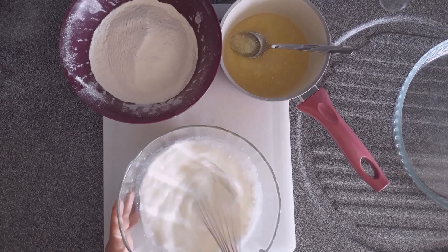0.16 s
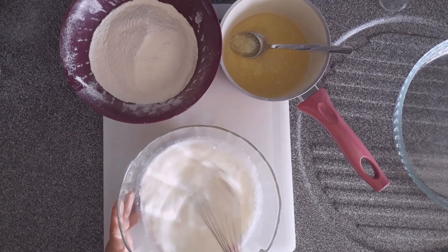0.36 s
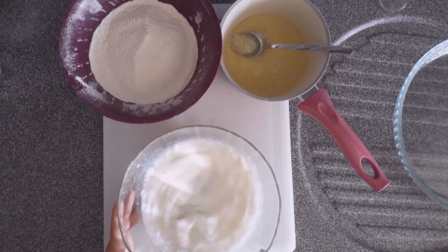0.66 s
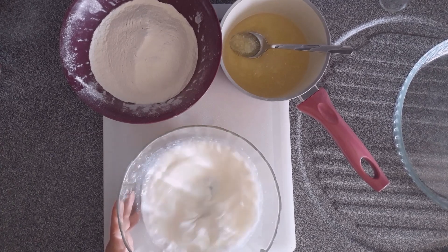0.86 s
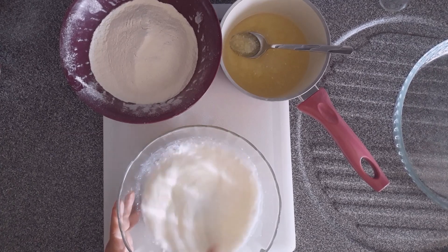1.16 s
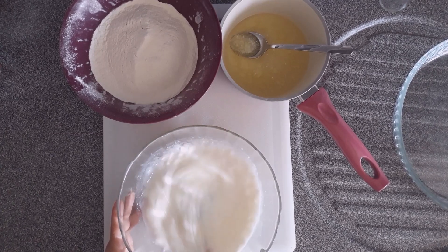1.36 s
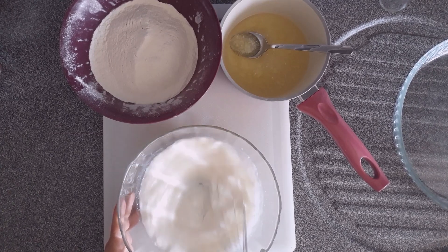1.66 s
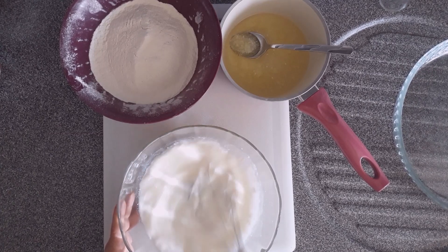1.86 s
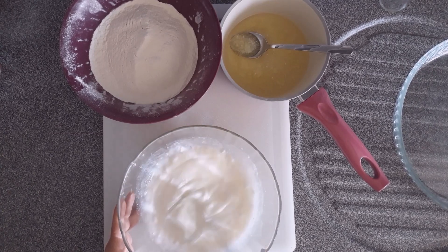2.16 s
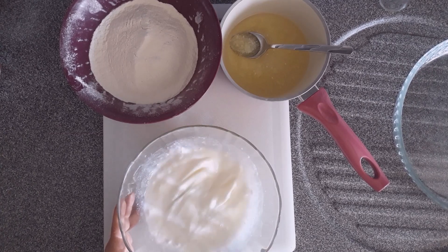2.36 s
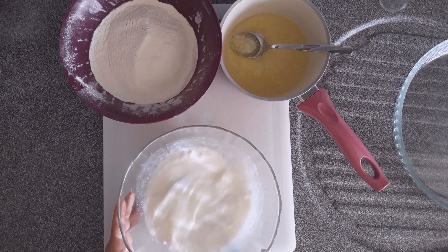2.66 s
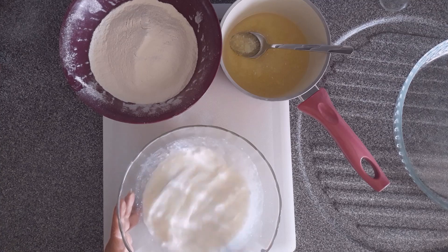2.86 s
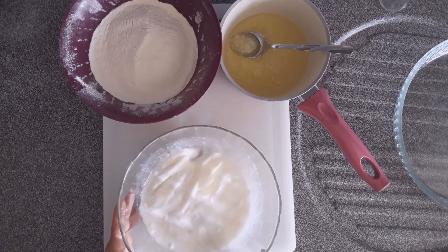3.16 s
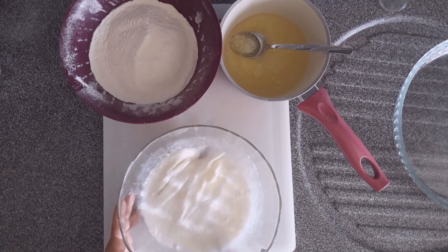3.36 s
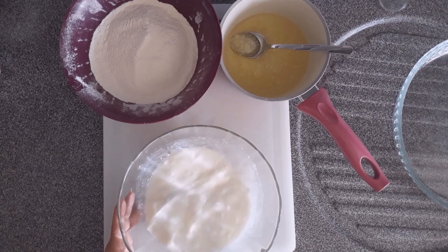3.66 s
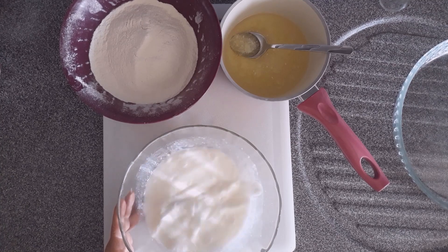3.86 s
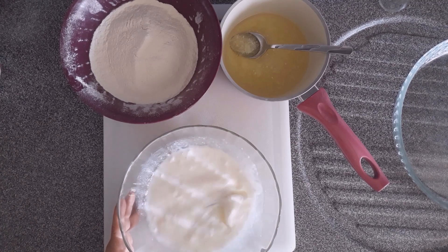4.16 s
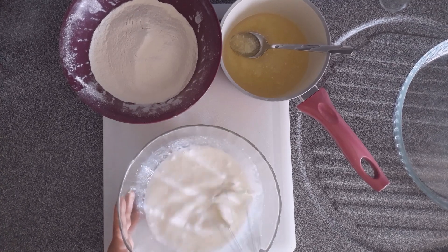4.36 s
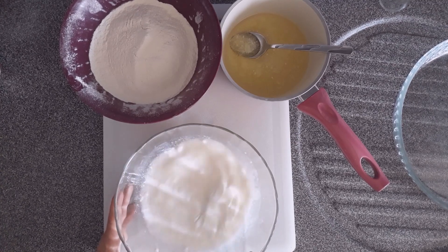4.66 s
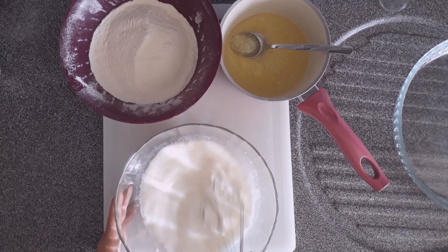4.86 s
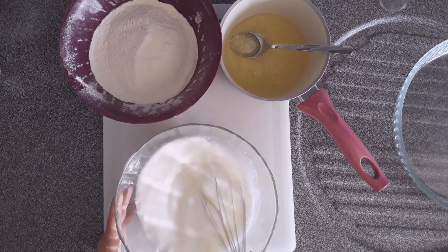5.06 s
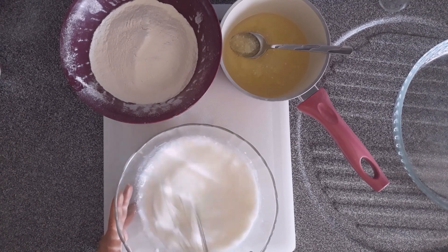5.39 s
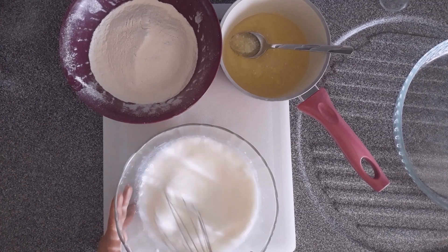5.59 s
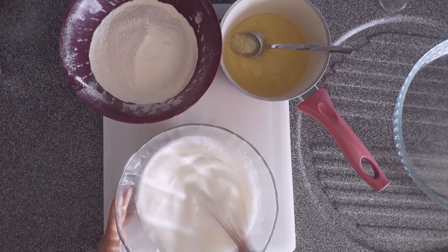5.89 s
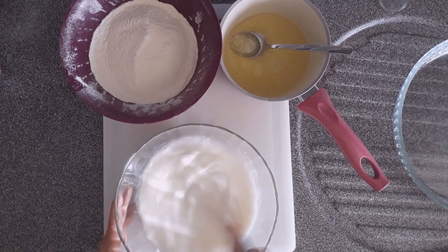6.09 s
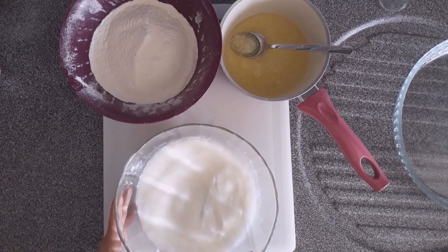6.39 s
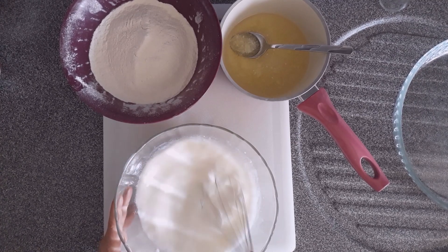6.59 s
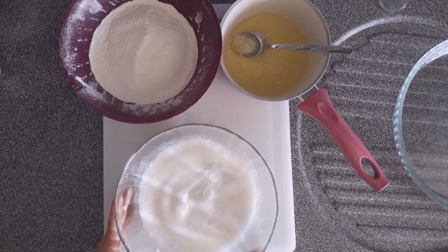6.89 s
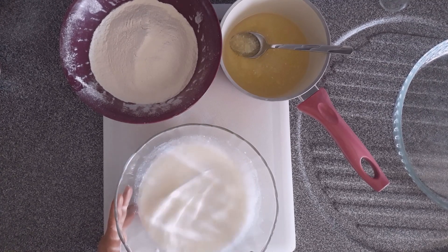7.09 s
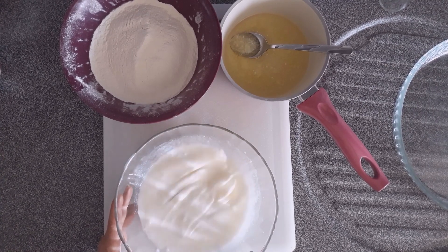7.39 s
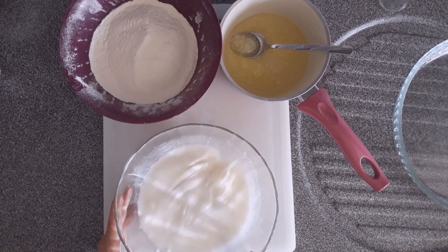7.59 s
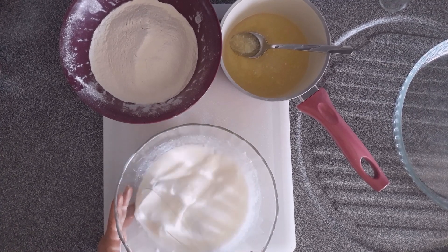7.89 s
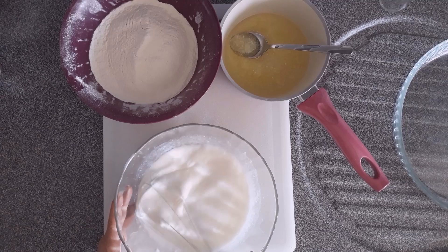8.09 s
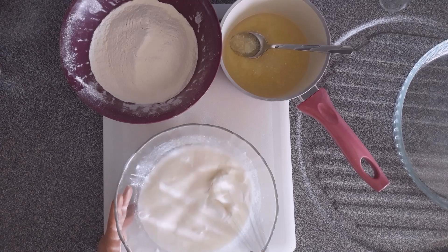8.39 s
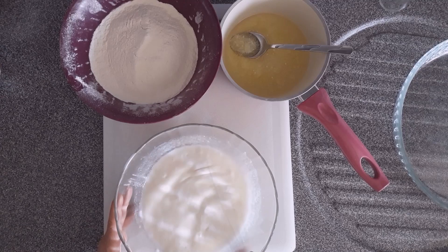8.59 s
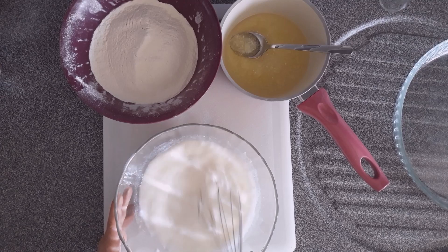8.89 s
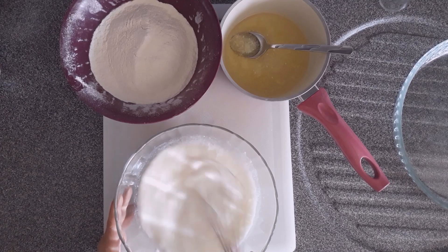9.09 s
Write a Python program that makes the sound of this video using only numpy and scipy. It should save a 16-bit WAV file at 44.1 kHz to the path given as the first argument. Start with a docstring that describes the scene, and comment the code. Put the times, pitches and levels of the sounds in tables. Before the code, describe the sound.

A thin metal whisk works runny batter in a glass bowl, heard close with slight hard-surfaced kitchen reflections and a low quiet hum. Gentle circling gives way to fast, even clattering strokes, each a sharp tinny tick plus a muffled bowl thud. Then comes a deeper, gurgling swirl with fewer ticks, another run of sharp strokes, and a last brief swirl. The glass rim occasionally rings faintly.

```python
"""A wire whisk stirs and beats thin batter in a glass bowl on a kitchen counter, held by one hand.
Trains of tiny clicks make the wires chatter on the glass; torn, spurting noise makes the wet swish.
Rising sine pings make the bubbles, ticks and taps; damped modes make the dull knock and the ringing rim.
A short, hard room tail and a quiet bed of coloured noise put it all in the kitchen."""
import sys
import numpy as np
from scipy import signal
from scipy.fft import rfft, irfft
from scipy.io import wavfile

SR = 44100
rng = np.random.default_rng(int(sys.argv[2]) if len(sys.argv) > 2 else 0)


def master(y):
    """Save y as 16-bit WAV."""
    cut = np.clip(np.atleast_2d(y).T, -1, 1)
    pcm = np.round(cut * 32767)  # scale
    wavfile.write(sys.argv[1], SR, pcm.astype(np.int16))


N = 407925


def amp(db):
    """Decibels to gain."""
    return 10 ** (np.asarray(db) / 20)


def unit(x):
    """Scale to an energy of one."""
    return x / np.sqrt(np.sum(x ** 2))


def clock(length):
    """Sample times over a length in seconds."""
    return np.arange(int(length * SR)) / SR


def curve(rows):
    """Join (time [s], value) rows by straight lines."""
    return np.interp(np.arange(N) / SR, *np.transpose(rows))


def add(track, s, sound):
    """Mix a sound into a track at a time in seconds."""
    start = max(int(s * SR), 0)
    part = sound[:max(N - start, 0)]
    track[start:start + len(part)] += part


def through(x, response):
    """Pass a sound through an impulse response."""
    return signal.fftconvolve(x, response)[:len(x)]


def colour(points, peaks=(), size=4096):
    """Causal unit-energy filter from (Hz, dB) points and (Hz, boost dB, width Hz) resonances."""
    hz, db = np.transpose(points)
    bins = np.fft.rfftfreq(size, 1 / SR)
    shape = np.interp(np.log(bins + 1), np.log(hz), db)
    for centre, boost, width in peaks:
        shape = shape + boost / (1 + (2 * (bins - centre) / width) ** 2)
    # folding the cepstrum forward makes the filter minimum-phase
    cepstrum = irfft(np.log(amp(shape)))
    cepstrum[1:size // 2] *= 2
    cepstrum[size // 2 + 1:] = 0
    response = unit(irfft(np.exp(rfft(cepstrum))))
    return np.pad(response, (0, len(clock(.5)) - size))


def ring(modes, start=0):
    """Damped modes sounding together; given its start time, a ring swings in step with earlier ones."""
    t = clock(0.54)
    return sum(amp(db - 60 * t / t60) * np.sin(2 * np.pi * hz * (t + start)) for hz, t60, db in modes)


def shifting(force, modes, detune, count=5):
    """Ring modes whose pitch keeps jumping as the batter heaves and reshapes the hollow."""
    reshape_s = 0.035  # how long the batter keeps one shape
    shape = rng.integers(count, size=N)[(np.arange(N) / SR / reshape_s).astype(int)]
    out = np.zeros(N)
    for k, step in enumerate(np.linspace(-1, 1, count)):
        detuned = [(hz * (1 + detune * step), t60, db) for hz, t60, db in modes]
        out += through(force * (shape == k), unit(ring(detuned)))
    return out


def clicks(size, rate, spread_db):
    """Random clicks of unequal strength, rate per second, rms one."""
    present = rng.random(size) < rate / SR
    strength = amp(spread_db * np.clip(rng.standard_normal(size), -2, 2))
    train = present * strength * rng.choice([-1, 1], size)
    return unit(train + 1e-9) * np.sqrt(size)


def swell(attack, hold, release):
    """Envelope that rises over the attack, is down to half at the hold time and dies with the release."""
    t = clock(hold + 10 * release)
    return np.minimum(t / attack, 1) / (1 + np.exp((t - hold) / release))


# colour of the quiet kitchen: (frequency [Hz], relative level [dB])
KITCHEN_COLOUR = [(25, -14.5), (55, -12), (72, 4), (90, 4.5), (800, -5), (2000, -13), (16000, -25.5)]


def kitchen(level_db=-49):
    """The quiet kitchen: a steady bed of noise, mostly a low hum-like rumble."""
    return amp(level_db) * through(rng.standard_normal(N), colour(KITCHEN_COLOUR))


def room(x, wet_db=-9, t60=0.36, treble_t60=0.24, gap_s=0.00374):
    """Counter, sink and tiles return a short diffuse tail, a little longer in the lows."""
    t = clock(.5)
    low_pass = signal.butter(2, 2500, fs=SR, output="sos")
    high_pass = signal.butter(2, 2500, "high", fs=SR, output="sos")
    low = signal.sosfilt(low_pass, rng.standard_normal(len(t)))
    high = signal.sosfilt(high_pass, rng.standard_normal(len(t)))
    tail = low * np.exp(-np.log(1000) * t / t60) + high * np.exp(-np.log(1000) * t / treble_t60)
    return x + amp(wet_db) * through(x, unit(tail * (t > gap_s)))


def radiate(x):
    """A bowl is too small to radiate deep bass."""
    return signal.sosfilt(signal.butter(2, 115, "high", fs=SR, output="sos"), x)


def bubble(hz, t60, rise=0.19):
    """A pocket of air rings and climbs in pitch as it nears the surface."""
    t = clock(t60)
    climbing = t + rise * t ** 2 / (2 * t60)
    return np.exp(-np.log(1000) * t / t60) * np.sin(2 * np.pi * hz * climbing)


# bubbles, and light wire taps and ticks in the shortest, highest rows:
# (time [s], relative level [dB], starting pitch [Hz], t60 [s])
POPS = [(0.475, -23, 948, 0.061), (.5871, -27, 3820, 0.011), (0.792, -25.5, 3960, 0.0075),
        (.847, -18.5, 914, 0.03), (1.62, -15.5, 3380, 0.014), (2.284, -22, 1260, 0.041),
        (2.394, 5, 7200, 0.0014), (2.394, -20.5, 910, 0.021), (2.56, -20.5, 482, 0.074),
        (2.965, -20.5, 465, 0.069), (3.002, -21.5, 760, 0.061), (3.236, -21.5, 780, 0.069),
        (4.2, -17, 5300, 0.025), (4.219, -20, 443, 0.087), (5.9932, -9.5, 993.4, 0.026),
        (6.2154, -22.5, 3750, .012), (8.521, -26.5, 1110, 0.033)]


def pops():
    """Single bubbles ring; the shortest, highest pings are light wire taps and ticks."""
    out = np.zeros(N)
    for s, db, hz, t60 in POPS:
        add(out, s, amp(db) * bubble(hz, t60))
    return out


# wires catching the bare glass:
# (time [s], relative level [dB], pitch favoured by the contact [Hz], offset of the other modes [dB])
CHIMES = [(4.157, -12.5, 3493, -14.5), (4.19, -48, 1652, -20), (4.212, -25, 2510, 0.5),
          (4.24, -33, 950, -27), (7.968, -26.5, 1652, -15), (8.17, -30, 1652, -14)]
# glass bowl, ringing freely: (frequency [Hz], t60 [s], relative level [dB])
GLASS_MODES = [(950, .28, -4), (1652, .52, -6), (2510, .4, -3), (3493, .22, -1), (4533, .19, 0),
               (4603, .19, -4), (6750, .16, -3), (8590, .15, -3)]


def chimes():
    """The rim rings: each rub feeds the mode nearest its own pitch and shifts the level of the others."""
    rub_cycles = 23  # swings that a rubbed mode needs to build up
    out = np.zeros(N)
    for s, db, favoured_hz, others_db in CHIMES:
        nearest = min(GLASS_MODES, key=lambda mode: abs(mode[0] - favoured_hz))[0]
        modes = [(hz, t60, mode_db + others_db * (hz != nearest)) for hz, t60, mode_db in GLASS_MODES]
        sound = ring(modes, s)
        build_up = np.minimum(np.arange(len(sound)) / SR * nearest / rub_cycles, 1)
        add(out, s, amp(db) * build_up * sound)
    return out


def froth(drive, low_hz, high_hz, cycles, count, spread_db=14):
    """Many bubbles of random size, each following the drive at its birth."""
    out, energy = np.zeros(N), 0
    for when, size, strength in rng.random((count, 3)):
        hz = low_hz * (high_hz / low_hz) ** size
        sound = amp(-spread_db * strength) * np.sqrt(hz) * bubble(hz, cycles / hz)
        add(out, when * N / SR, drive[int(when * N)] * sound)
        energy += np.sum(sound ** 2)
    return out * np.sqrt(N / energy)


def bubbles(speed, depth, largest_db=-35):
    """Deep gulps, lighter gurgles and a high fizz follow the moving wires."""
    # a pocket holds only so much air, however fast the wires move
    air = amp(largest_db) * np.tanh(speed / amp(largest_db))
    gulps = amp(-10) * froth(air * depth, 301, 604, cycles=28, count=700)
    gurgles = amp(-7.0) * froth(air, 614, 1235, cycles=43, count=600)
    fizz = amp(-8.5) * froth(air, 2690, 6800, cycles=34, count=500)
    return gulps + gurgles + fizz


# low modes of the room (142, 189, 315 Hz), then bowl, batter and board moving together: (centre frequency [Hz],
# t60 [s], relative level [dB])
BODY_MODES = [(142, 0.67, -12.5), (189.2, 0.38, -10.5), (314.8, 0.36, -8.5), (465, 0.096, 5),
              (531, 0.099, 8.5)]


def body_knock(push, slosh, depth):
    """Bowl, batter and board knock dully together and wake low room modes, heavier as the whisk reaches deeper."""
    return shifting((amp(-4.0) * push + amp(-9.0) * slosh) * depth, BODY_MODES, detune=0.053)


# hollow of the bowl above the batter, plus a damped ring of the glass at 954 Hz: (centre frequency [Hz], t60
# [s], relative level [dB])
HOLLOW_MODES = [(755.5, 0.057, 4.5), (954, 0.15, -6), (1387, 0.025, 0.5)]


def hollow_ring(push, slosh):
    """Pushes and slosh excite the hollow of the bowl above the batter and a damped ring of the glass."""
    return shifting(amp(-3.0) * push + amp(-9.0) * slosh, HOLLOW_MODES, detune=0.0418)


# bands in which wet wires sing near the surface: (centre frequency [Hz], t60 [s], relative level [dB])
SKIM_MODES = [(3302, 0.013, 4), (5620, 0.011, 0.5)]


def surface_skim(skimming, coated, depth):
    """Wet wires sing briefly near the surface, weaker as the whisk reaches deeper."""
    force = (amp(-8.0) * skimming + amp(-10.5) * coated) / np.sqrt(depth)
    return shifting(force, SKIM_MODES, detune=0.085)


# broad resonances of the batter-filled bowl: (frequency [Hz], boost [dB])
BOWL_PEAKS = [(3380, 5.5), (5520, 7), (6780, 8), (8120, 0.5), (9550, -1.5), (10380, 2), (12650, 3.5)]


def bowl_peaks(width_hz=540):
    """The batter-filled bowl colours every scrape and swish with broad resonances."""
    return [(hz, db, width_hz) for hz, db in BOWL_PEAKS]


# colour of the wet swish: (frequency [Hz], relative level [dB])
SWISH_COLOUR = [(150, -10), (1300, 9), (2100, -0.5), (3200, 4), (4400, -1.5), (5400, 4.5), (6200, 2),
                (8300, 12), (11500, 1.5), (16000, -9.5)]


def wet_swish(speed, depth):
    """Films of batter tear between the moving wires in tiny clicks."""
    tearing = speed * clicks(N, rate=7000, spread_db=4.5)
    return through(tearing * depth ** 0.37, amp(-2.0) * colour(SWISH_COLOUR, bowl_peaks()))


# how deep the whisk reaches: (time [s], weight of the low slosh [dB])
DEPTH = [(0, -8.5), (1.6, -9.5), (3.0, -0.5), (5.8, 4.5), (9.2, 4)]


def reach():
    """Depth of the whisk as a gain: deeper stirring puts more weight into the lows."""
    return amp(curve(DEPTH))


def passing_wires(gap_s=.022, fade_s=0.011, spread_db=2.5, steady=0.55):
    """The loops of the cage break through the batter one after another: a swish in spurts, rms one."""
    spurts = np.zeros(N)
    t = clock(.1)
    spurt = t / fade_s * np.exp(-2 * t / fade_s)
    for k, (early, strength) in enumerate(rng.uniform(-1.12, 1, (int(N / SR / gap_s), 2))):
        add(spurts, (k + early / 2) * gap_s, amp(spread_db * strength) * spurt)
    return unit(spurts / np.std(spurts) + steady) * np.sqrt(N)


# round stirring with the whisk kept in the batter: (start [s], end [s], relative steady swish [dB])
SPELLS = [(0, 1.8, -49), (4.451, 6.79, -51), (8.66, 9.3, -47.5)]
# turns of the whisk round the bowl: (time [s], relative swish level [dB])
TURNS = [(0.017, -49), (.24, -46.5), (.56, -45), (.76, -46.5), (1.0, -52), (1.211, -50.5), (1.42, -48),
         (1.605, -45), (1.885, -39.5), (4.591, -35), (4.812, -36), (5.025, -31), (5.238, -35.5),
         (5.466, -33.5), (5.661, -29.5), (5.869, -32.5), (6.077, -29), (6.316, -40.5), (6.54, -42.5),
         (8.744, -42.5), (8.863, -40), (9.072, -38.5)]
# how much batter the beating strokes drag along: (time [s], relative swish level [dB])
DRAG = [(2.1, -34), (2.95, -35), (7.7, -35.5), (8.6, -39.5)]


def flow(dip_s=0.0071, lift_s=0.003, return_s=0.12, return_db=-13, lead_in_s=0.0091):
    """Speed of the wires in batter: a sweep and gentler return on each turn, a drag on each stroke."""
    turning, speed = np.zeros(N), np.zeros(N)
    sweep = swell(attack=0.0056, hold=0.071, release=0.012)
    for s, db in TURNS:
        add(turning, s, amp(db) * sweep)
        add(turning, s + return_s, amp(db + return_db) * sweep)
    for start, end, db in SPELLS:
        immersed = np.zeros(N)
        add(immersed, start, swell(dip_s, end - start, lift_s))
        speed += immersed * (amp(db) + turning)
    drag = swell(attack=0.019, hold=0.098, release=0.028)
    for s, *_ in STROKES:
        drag_db = np.interp(s, *np.transpose(DRAG))
        # the drag swells in softly, starting just before each stroke
        add(speed, s - lead_in_s, amp(drag_db) * drag)
    return speed


def chatter(decay, bite_s=0.0004):
    """A wire bites and skips over the glass: a quickly fading train of tiny blows."""
    t = clock(.1)
    train = clicks(len(t), rate=3000, spread_db=4.0) * np.exp(-t / decay) * (1 - np.exp(-t / bite_s))
    return unit(train) * np.sqrt(decay * SR / 2)


def tinkle(decay, ring_db=-9, t60=0.022, low_hz=4200, high_hz=10000):
    """Chatter of one wire, which also rings briefly at two pitches of its own."""
    train = chatter(decay)
    own = unit(ring([(hz, t60, 0) for hz in rng.uniform(low_hz, high_hz, 2)])[:len(train)])
    return unit(unit(train) + amp(ring_db) * own) * np.linalg.norm(train)


# colour of a wire contact: (frequency [Hz], relative level [dB])
CONTACT_COLOUR = [(200, -20.5), (1350, 3), (1900, -7), (3100, 2), (4300, -3.5), (5100, 0), (6200, -4.5),
                  (8000, 6.5), (12500, -6), (16000, -13.5)]
# resonances of the steel wires: (frequency [Hz], boost [dB])
WIRE_PEAKS = [(6770, 4.5), (9490, 13), (11720, 9)]


def wire_contacts(bare, coated, wire_width_hz=160):
    """Contacts through batter lack the steel resonances but keep each wire's brief ring."""
    wire_peaks = [(hz, db, wire_width_hz) for hz, db in WIRE_PEAKS]
    steel = through(bare, amp(2.0) * colour(CONTACT_COLOUR, bowl_peaks() + wire_peaks))
    scrape = through(coated, amp(1.5) * colour(CONTACT_COLOUR, bowl_peaks()))
    return steel + scrape


# beating strokes, all levels relative: (time [s], first contact [dB], lag of the trailing wires [s],
# trailing wires [dB], bowl knock [dB])
STROKES = [(2.089, -28, 0.019, -33, -32), (2.308, -22, 0.018, -30, -27), (2.511, -19.5, 0.03, -32.5, -32),
           (2.721, -22, 0.018, -26.5, -30), (2.922, -21, 0.025, -27.5, -29.5),
           (3.118, -20.5, 0.012, -29, -29.5), (3.314, -17.5, 0.02, -29.5, -24.5),
           (3.522, -17, 0.017, -21.5, -23), (3.735, -18.5, 0.012, -20, -23),
           (3.941, -15.5, 0.0099, -22.5, -24), (4.146, -17, 0.023, -20.5, -28.5),
           (4.357, -19, 0.0093, -42, -25.5), (6.931, -19, 0.016, -32, -29), (7.137, -18, 0.013, -26, -26),
           (7.352, -18.5, .015, -23.5, -26.5), (7.555, -15, 0.015, -24.5, -26.5),
           (7.765, -16.5, 0.019, -28, -26), (7.968, -19.5, 0.02, -31, -25),
           (8.168, -17.5, 0.014, -27.5, -24.5), (8.383, -14.5, 0.011, -16.5, -23),
           (8.611, -23.5, 0.0096, -41, -29.5)]
# single scrapes of the wires on the glass: (time [s], relative level [dB], relative bowl knock [dB])
SCRAPES = [(0.15, -40, -35), (0.172, -34.5, -36), (0.274, -45, -33), (.355, -42.5, -36), (.471, -33, -27.5),
           (0.675, -35.5, -30), (.908, -43.5, -34), (1.09, -36.5, -39), (1.297, -39.5, -34),
           (1.32, -34, -31.5), (1.517, -37, -29), (1.618, -35.5, -29.5), (1.634, -41, -32),
           (1.742, -40, -29.5), (1.826, -35.5, -36.5), (1.932, -35.5, -34), (3.023, -36, -26.5),
           (3.198, -34, -27.5), (3.37, -39, -54), (4.212, -22, -37), (4.571, -35, -35), (4.725, -39.5, -38),
           (4.802, -37.5, -34), (4.924, -37.5, -37), (5.044, -29, -33), (5.237, -41.5, -36),
           (5.309, -33.5, -39.5), (5.347, -37, -36), (5.452, -36.5, -31), (5.563, -37, -34),
           (5.695, -37, -26), (5.781, -34, -26.5), (6.003, -29, -29), (6.111, -31, -28.5),
           (6.215, -33.5, -36), (6.436, -30.5, -35.5), (6.477, -35, -39.5), (6.666, -34, -35.5),
           (6.767, -33, -31.5), (8.052, -33, -36), (8.466, -31.5, -33.5), (8.705, -31.5, -59),
           (8.946, -30.5, -36), (9.167, -32, -40)]


def whisk(lead_decay=0.0065, trail_decay=0.0082, scrape_decay=0.011):
    """Forces of the wires: on bare glass, through a coat of batter, and as a heavier push on the bowl."""
    rattle_s, rattle_db, rattle_fade_db_per_s = 0.09, -11, 92
    bare, coated, push = np.zeros((3, N))
    for s, first_db, lag, second_db, knock_db in STROKES:
        # the leading wires land on bare glass one after another, then the rest plunges in
        add(bare, s, amp(first_db + 1.5) * tinkle(lead_decay))
        add(bare, s + lag / 2, amp(first_db - 8) * tinkle(lead_decay / 2))
        add(coated, s + lag, amp(second_db + 4.0) * tinkle(trail_decay))
        # loose wires rattle on, fading as the whisk slows
        for late in rattle_s * rng.random(size=3):
            late_db = first_db + rattle_db - rattle_fade_db_per_s * late
            add(coated, s + lag + late, amp(late_db) * tinkle(lead_decay / 2))
        add(push, s, amp(knock_db) * chatter(lead_decay))
        add(push, s + lag, amp(knock_db + 2.0) * chatter(lead_decay))
    for s, db, knock_db in SCRAPES:
        add(coated, s, amp(db + 4.0) * tinkle(scrape_decay))
        add(push, s, amp(knock_db + 3.5) * chatter(scrape_decay))
    return bare, coated, push


def scene():
    """Contacts and swish excite wires, glass and bowl; all of it sounds in the kitchen."""
    bare, coated, push = whisk()
    stirring, depth = flow(), reach()
    speed = stirring * passing_wires()
    # the surface and the deep slosh have spurts of their own
    skimming = stirring * passing_wires(gap_s=0.04, steady=0.17) * rng.standard_normal(N)
    slosh = stirring * passing_wires() * clicks(N, rate=900, spread_db=1)
    bowl = body_knock(push, slosh, depth) + hollow_ring(push, slosh)
    bowl += surface_skim(skimming, coated, depth) + wet_swish(speed, depth)
    bowl += bubbles(speed, depth) + wire_contacts(bare, coated)
    # chimes and pops get less room tail
    chimes_and_pops = pops() + chimes()
    mix = kitchen() + room(radiate(bowl)) + room(radiate(chimes_and_pops), wet_db=-14)
    return mix[None]


def record(dry):
    """The sharpest peaks are gently rounded and the very top is cut."""
    top_cut = signal.ellip(8, .2, 70, 15900, fs=SR, output="sos")  # order, ripple dB, rejection dB, Hz
    return signal.sosfilt(top_cut, np.tanh(dry))


dry = scene()
out = record(dry)
master(out)
```